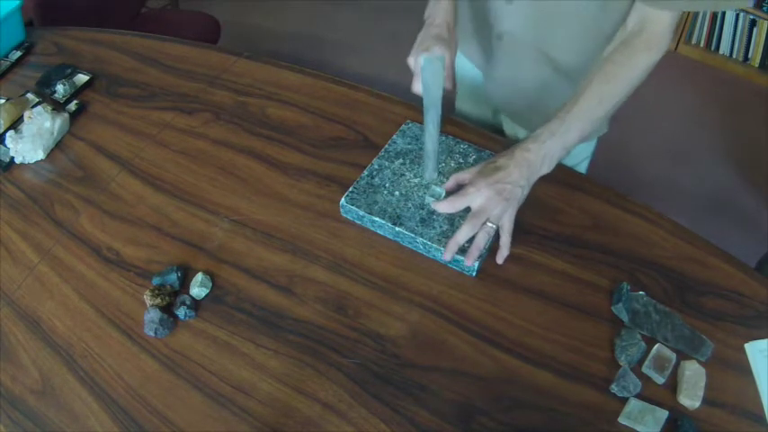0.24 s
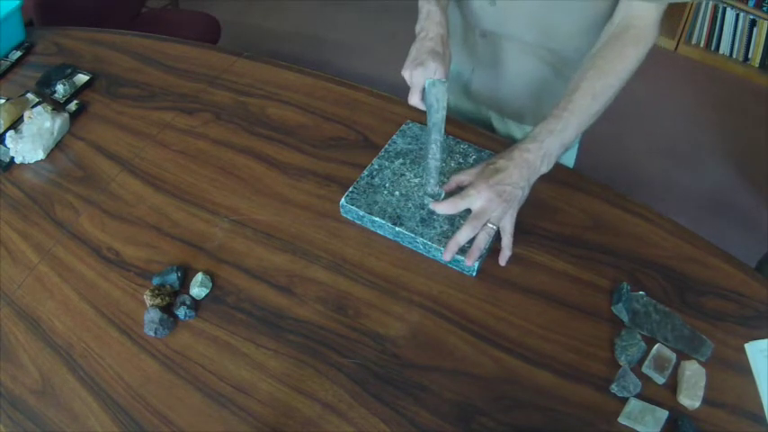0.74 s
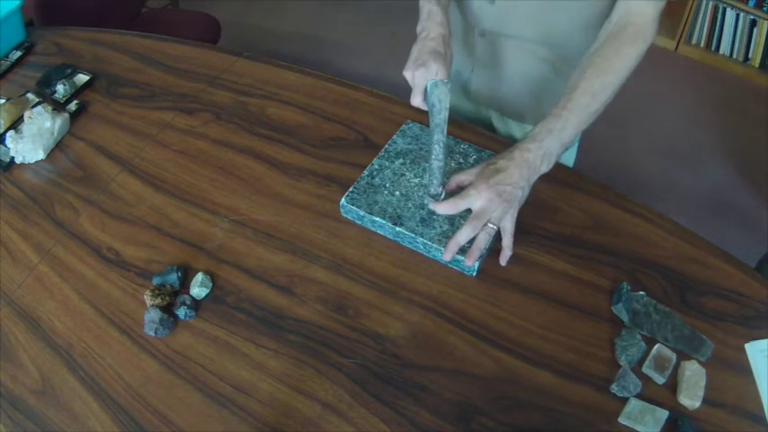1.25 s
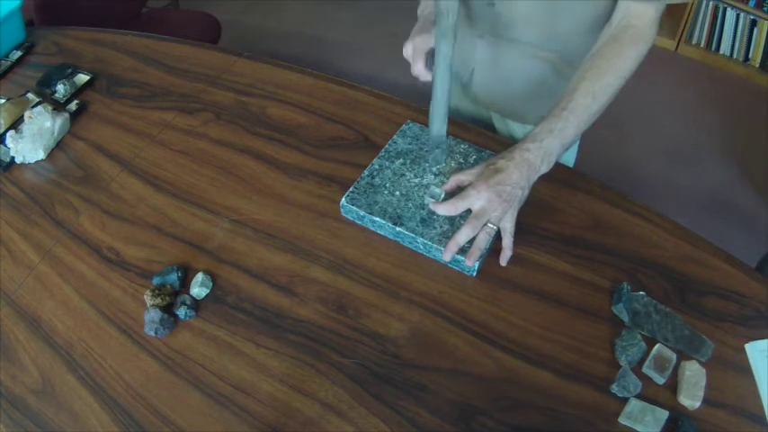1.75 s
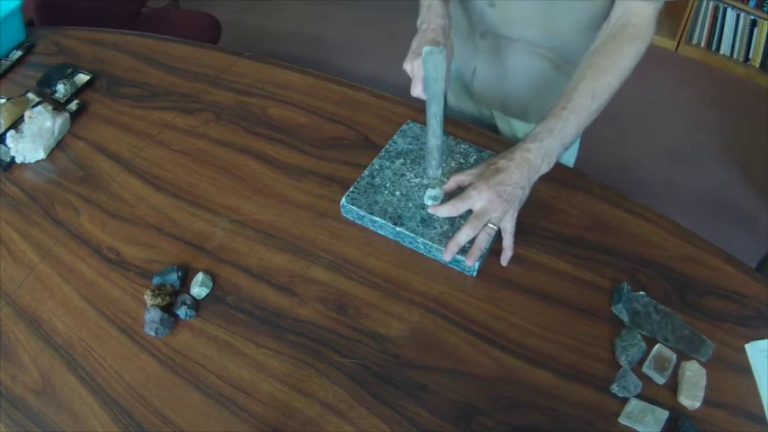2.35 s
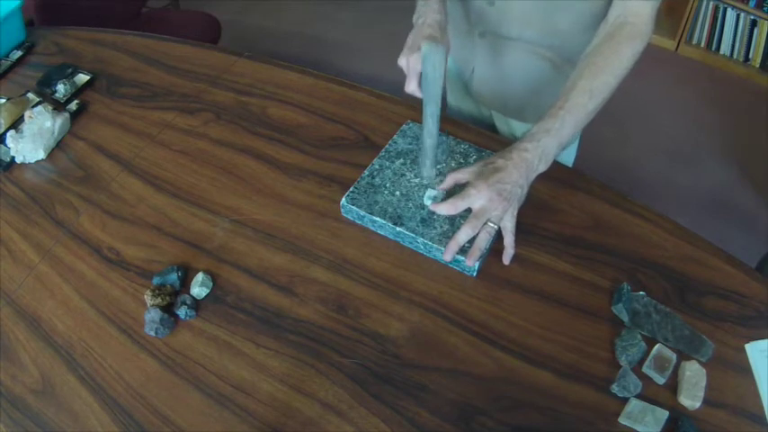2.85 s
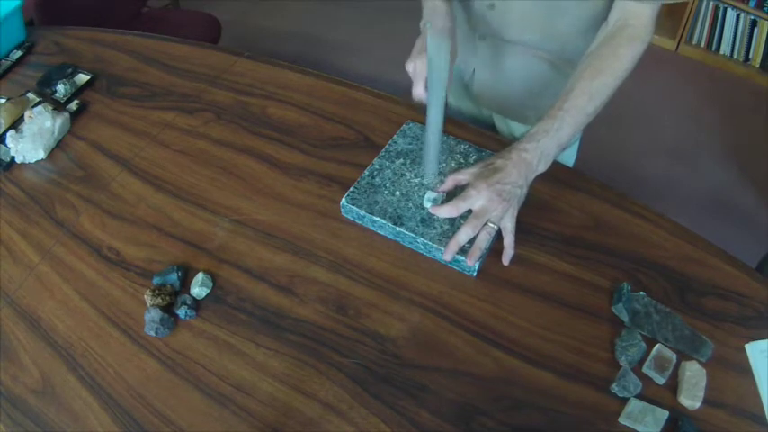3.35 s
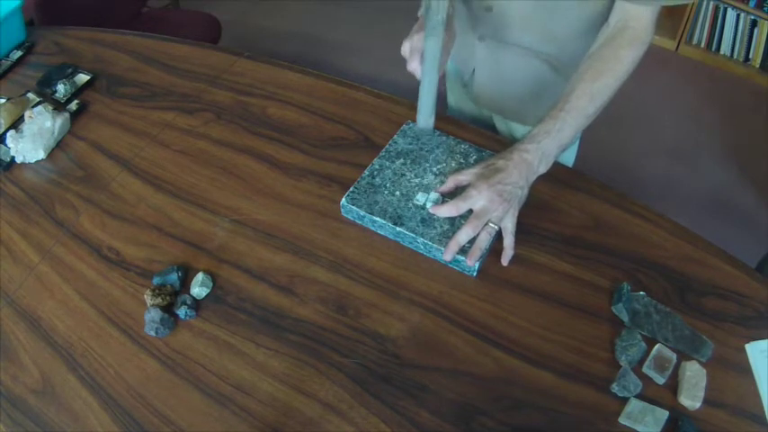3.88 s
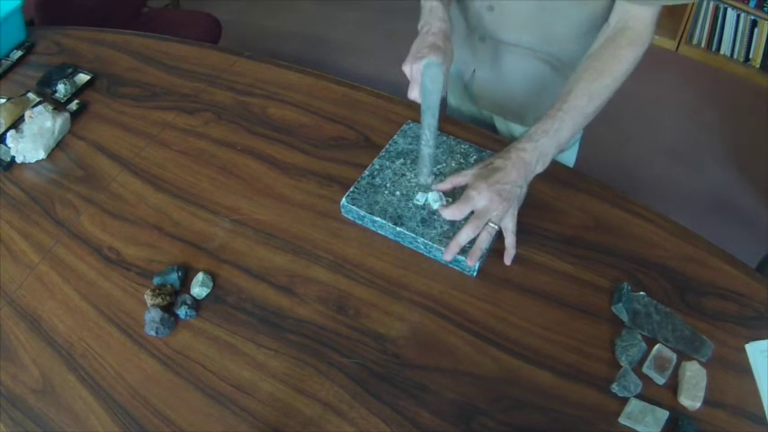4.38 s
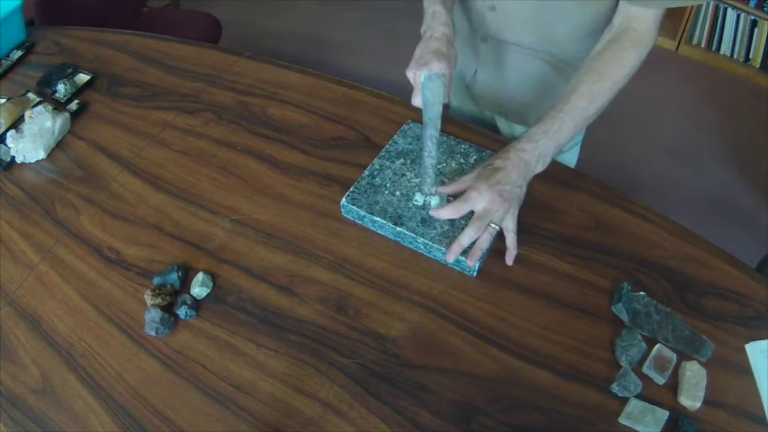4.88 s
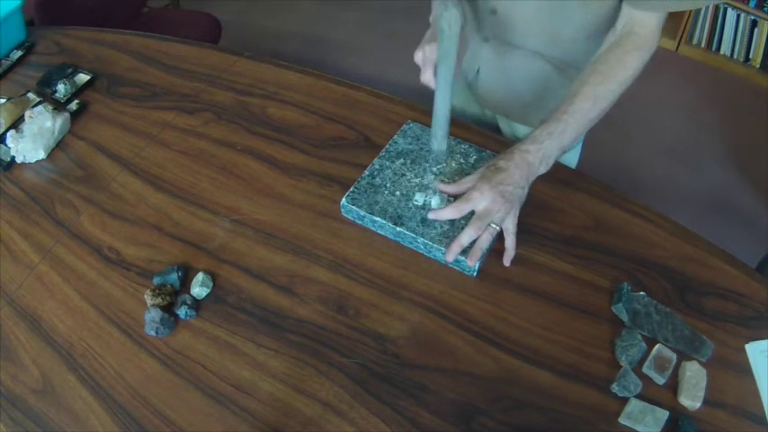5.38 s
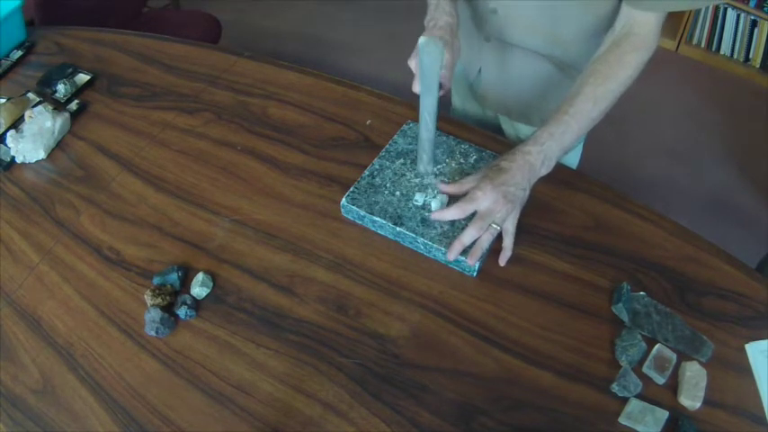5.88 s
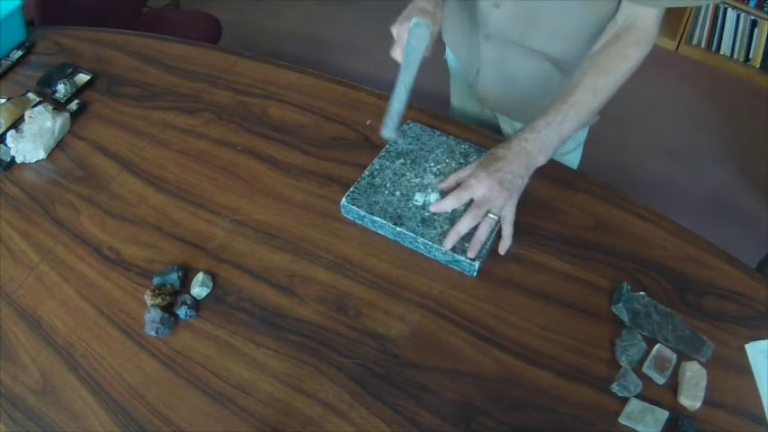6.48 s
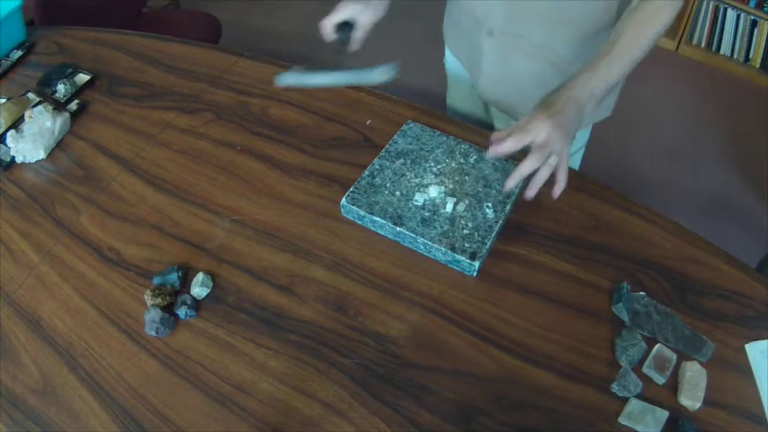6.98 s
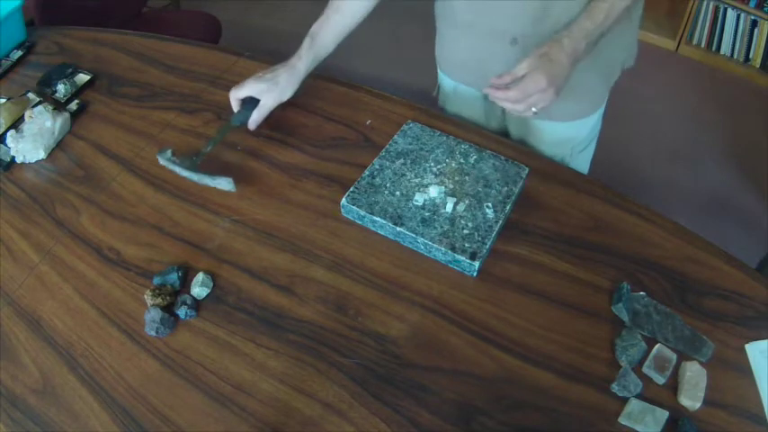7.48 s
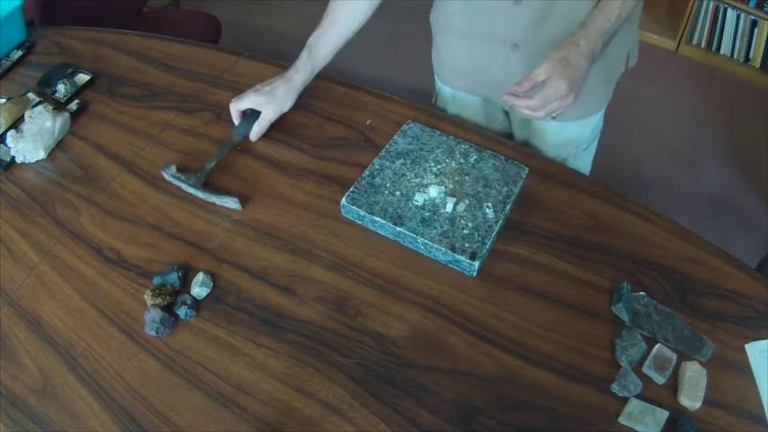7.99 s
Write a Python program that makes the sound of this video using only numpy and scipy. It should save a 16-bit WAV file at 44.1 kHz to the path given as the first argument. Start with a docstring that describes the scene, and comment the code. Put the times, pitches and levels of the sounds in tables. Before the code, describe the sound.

In a small room with a steady, low rush of ventilation, a crystal is split close to the microphone. After one soft trial tap come three loud hammer blows, steel clacking on stone, the crystal crunching and the wooden table booming with a brief room echo. Faint chip ticks and two soft bumps fall in the gaps. Last, the hammer knocks and rattles briefly as it is put down on the table.

```python
"""A small room with a wooden table, a stone slab on top. The chisel end of a steel hammer taps a crystal
on the slab, then strikes it three times: the crystal crunches, the slab clacks, the table booms, the
steel rings and the room answers. Chips tick and the table bumps softly as the crystal is handled.
At the end the hammer is laid on the table and clatters. Ventilation runs steadily underneath;
a limiter ducks it after each hard blow."""
import sys
import numpy as np
from scipy import signal
from scipy.fft import rfft, irfft, next_fast_len
from scipy.io import wavfile
from scipy.ndimage import uniform_filter1d, minimum_filter1d, map_coordinates

SR = 44100
rng = np.random.default_rng(int(sys.argv[2]) if len(sys.argv) > 2 else 0)


def generate_wav(signal):
    """Clip the signal to [-1, 1] and save it as 16-bit WAV at the path in sys.argv[1]."""
    frames = np.transpose(np.atleast_2d(signal))
    scaled = np.clip(frames, -1, 1) * 32767
    pcm = np.round(scaled).astype(np.int16)
    wavfile.write(sys.argv[1], SR, pcm)


N = 363075

# a trial tap, a blow and its rebound, two more blows: t/s, strength/dB, clack trim/dB, crunch trim/dB
HAMMER_HITS = [(1.3240, -16, -16.5, 8.5), (1.8746, 5.5, -2, 1.5), (1.9048, -9, 8, -13),
               (3.4265, 6.5, 1.5, -10), (5.5030, 7, 0, -12)]

def hammer_blows():
    """Steel meets crystal: each hit layers boom, crunch, clack and ring, then excites the room."""
    out = np.zeros(N)
    for start, db, clack_db, crunch_db in HAMMER_HITS:
        hardness_db = db + clack_db
        boom = table_boom(hardness_db)
        crunch = crystal_crunch(db, crunch_db)
        clack = slab_clack(clack_db)
        steel = hammer_ring(hardness_db)
        tail = reverb(amp(-8.5) * clack + amp(-11) * crunch, build=.0085)
        add(out, start, amp(db) * (with_reflections(boom, crunch) + clack + steel + tail))
    return out


# modes of the table under the slab: f/Hz, level/dB, t60/s
TABLE_MODES = [(60, -36, .45), (87, -30.5, .42), (111, -30.5, .45), (135, -32, .5), (176, -26.7, .31),
               (216, -16, .1), (271, -9.9, .1), (325, -24.5, .42), (364, -23, .36), (406, -29.6, .35),
               (456, -4, .05), (480, -26.5, .35), (525, -11.8, .17), (559, -18.4, .26), (648, -25.5, .32),
               (691, -4.2, .07), (722, -28.2, .42), (786, -13.6, .19), (807, -4.8, .09), (851, -16.8, .14),
               (934, -20, .2), (1031, -33.5, .33), (1241, -14.5, .03)]

def table_boom(hardness_db):
    """The blow pushes the table into ringing; a harder contact is shorter, so the boom is brighter."""
    push_hz = 2260 * 2 ** (hardness_db / 19.5)
    body = ring(TABLE_MODES, attack=.0004, scatter_db=.5) + amp(8) * wood_wash(build=.0038)
    boom = np.zeros(SR)
    add(boom, .0005, lowpass(body, push_hz, order=2))  # the push arrives once the edge has bitten
    return boom


# colour of the wood's dense modes: f/Hz, level/dB
WOOD_SPECTRUM = [(40, -10), (120, -3.5), (330, 1), (600, -1.5), (780, -3), (950, -3.5), (1300, -8),
                 (2200, -19.5), (4000, -54.5)]

def wood_wash(build):
    """Countless weak modes of table and room blur into one wash."""
    return reverb(click(WOOD_SPECTRUM), build)


# sizzle of crushed crystal: f/Hz, level/dB
CRUNCH_SPECTRUM = [(2500, -38), (5000, -14), (6600, -20), (7800, -5), (9200, -12), (12500, -2.5),
                   (14800, -2), (16000, -11.5)]

def crystal_crunch(strength_db, trim_db):
    """The crystal snaps and fine chips spray off; a stronger blow crushes finer and sounds brighter."""
    cutoff_hz = 12000 * 2 ** (strength_db / 21)
    snap = burst(CRUNCH_SPECTRUM, t60=.006)
    spray = amp(-9.5) * burst(CRUNCH_SPECTRUM, t60=.09)
    return amp(trim_db - 5) * lowpass(snap + spray, cutoff_hz, order=4)


# midrange bite of the slab: f/Hz, level/dB
CLACK_SPECTRUM = [(500, -62), (1100, 6), (1600, 10.5), (2400, 2.5), (3300, 3.5), (4400, -8.5), (5500, -18),
                  (7000, -24), (10000, -41), (16000, -48)]

def slab_clack(trim_db):
    """The stone takes the blow with a short, hard clack."""
    return amp(trim_db + 4) * burst(CLACK_SPECTRUM, t60=.053)


# rough ring of the hammer head: f/Hz, level/dB
STEEL_SPECTRUM = [(2400, -46), (3020, -6), (3150, 4), (3270, 4), (3350, -20), (4100, -16), (5000, -30)]
# its one clear mode: f/Hz, level/dB, t60/s
STEEL_MODE = [(3285, -38.5, 0.45)]

def hammer_ring(hardness_db):
    """The head rings in a narrow band around one clear mode; a harder contact wakes it more."""
    head = burst(STEEL_SPECTRUM, t60=.38) + ring(STEEL_MODE, attack=.0004, scatter_db=3)
    return amp(-17 + .31 * hardness_db) * head


# the hammer settling: t/s, strength/dB, clack trim/dB
BOUNCES = [(8.0479, -8.5, 5), (8.0865, -11, 4.5), (8.1075, -12.5, -4), (8.1128, -17, 12.5),
           (8.1155, -5, -16), (8.1345, -8.5, -10), (8.1528, -16.5, -15)]
# modes of the bare table top under a light, hard contact: f/Hz, level/dB, t60/s
TABLETOP_MODES = [(131, -21, 0.29), (359, -24, 0.23), (655, -2, 0.023), (759, 1, 0.028), (837, -2, 0.045),
                  (1414, -4.5, 0.021), (1673, -21, 0.057), (2050, -13, 0.03)]
# clack of steel on wood: f/Hz, level/dB
BOUNCE_SPECTRUM = [(300, -13), (650, -14), (900, -7), (1200, 7), (2000, 10), (2600, -30), (3300, -6),
                   (4800, -19.5), (5800, -21), (7500, -36), (15000, -46)]

def hammer_clatter():
    """The laid-down hammer bounces on the wood: each contact is a short knock with a clack on top."""
    out = np.zeros(N)
    for start, db, clack_db in BOUNCES:
        knock = ring(TABLETOP_MODES, attack=.0004, scatter_db=1)
        clack = amp(clack_db + 5.5) * burst(BOUNCE_SPECTRUM, t60=.021)
        wash = amp(3.5) * wood_wash(build=.0043)
        tail = reverb(amp(-10) * knock + amp(-6) * clack, build=.0012)
        add(out, start, amp(db) * (amp(-3.5) * knock + clack + wash + tail))
    return out


# touches of chips and fingers: t/s, relative level/dB, centre f/Hz
CHIP_TICKS = [(2.345, -33, 1430), (2.348, -46, 4000), (5.691, -52, 11030), (5.699, -48, 11500),
              (7.287, -49, 6650), (7.306, -46, 5800), (7.353, -57, 12000)]

def chip_ticks():
    """Handled chips give faint, narrow-band clicks."""
    out = np.zeros(N)
    for start, db, hz in CHIP_TICKS:
        tick = burst([(hz / 2, -22), (hz, 0), (hz * 2, -24), (hz * 4, -50)], t60=.009)
        tail = amp(-3.5) * reverb(tick, build=.0056)
        add(out, start, amp(db + 9.5) * (tick + tail))
    return out


# nudges as the crystal is repositioned: t/s, level/dB
TABLE_BUMPS = [(4.769, -12), (4.893, -7.5)]

def table_bumps(hz=120):
    """A soft touch wakes only the bass of the table."""
    out = np.zeros(N)
    spectrum = [(hz / 2, -20), (hz, 0), (hz * 2, -20), (hz * 10, -70)]
    for start, db in TABLE_BUMPS:
        add(out, start, amp(db) * burst(spectrum, t60=.15))
    return out


# slaps off ceiling and walls: delay/s, boom gain, crunch gain
REFLECTIONS = [(.009, .02, .5), (.0214, .15, .26), (.0315, .15, .06)]

def with_reflections(boom, crunch):
    """The direct hit, followed by its first bounces around the room."""
    out = boom + crunch
    for delay, boom_gain, crunch_gain in REFLECTIONS:
        add(out, delay, boom_gain * boom + crunch_gain * crunch)
    return out


# decay of the small room: f/Hz, t60/s
ROOM_DECAY = [(100, 0.4), (500, 0.44), (1500, 0.26), (3500, 0.22), (7000, 0.26), (14000, 0.21)]

def reverb(x, build):
    """A fresh diffuse tail swells with time constant build (s) and dies sooner in the treble."""
    hz, t, noise = signal.stft(rng.standard_normal(SR), SR, nperseg=256)
    decay = amp(-60 * t / along(ROOM_DECAY, hz)[:, None])
    tail = signal.istft(noise * decay, SR, nperseg=256)[1][:SR]
    tail *= 1 - np.exp(-np.arange(SR) / SR / build)
    return signal.fftconvolve(x, tail / np.linalg.norm(tail))[:SR]


# colour of the rushing air: f/Hz, relative level/dB
AIR_SPECTRUM = [(20, -2), (50, 1.5), (95, -4), (135, 1.5), (200, 0), (300, -3.5), (600, -1), (800, -8),
                (1050, -15), (1400, -19), (1900, -14.5), (3000, -25.5), (4200, -30.5), (5400, -31.5),
                (6600, -37), (10000, -39.5), (10500, -36.5), (11300, -43), (14500, -46), (16000, -67)]
# fan and mains tones: f/Hz, rms level/dB
HUM_TONES = [(118.6, -51.5), (414.5, -58), (581.4, -62.5)]

def ventilation():
    """A steady bed of rushing air under a few slightly wavering tones."""
    air = unit(filtered(rng.standard_normal(N), lambda hz: amp(along(AIR_SPECTRUM, hz))))
    t = np.arange(N) / SR
    hum = np.zeros(N)
    for hz, db in HUM_TONES:
        level = amp(db + 1.2 * wobble(.84))
        phase = 2 * np.pi * hz * t + 1.63 * wobble(6.7)
        hum += level * np.sqrt(2) * np.sin(phase)
    return amp(-44 + .73 * wobble(7.4)) * air + hum


def click(spectrum, size=2048):
    """The sharpest causal pulse with this spectrum, at energy 1."""
    gain = amp(along(spectrum, np.fft.rfftfreq(size, 1 / SR)))
    cepstrum = irfft(np.log(gain))
    cepstrum[1:size // 2] *= 2  # fold to minimum phase
    cepstrum[size // 2 + 1:] = 0
    pulse = irfft(np.exp(rfft(cepstrum)))
    return pulse / np.linalg.norm(pulse)


def burst(spectrum, t60):
    """One second that opens with a coloured, fading burst of noise, at energy 1."""
    t = np.arange(SR) / SR
    noise = rng.standard_normal(SR) * amp(-60 * t / t60)
    coloured = signal.fftconvolve(noise, click(spectrum))[:SR]
    return coloured / np.linalg.norm(coloured)


def ring(modes, attack, scatter_db):
    """One second of struck modes, each at a slightly new strength."""
    t = np.arange(SR) / SR
    hz, db, t60 = np.transpose(modes)[:, :, None]
    envelopes = amp(db + scatter_db * rng.standard_normal(db.shape) - 60 * t / t60)
    return (envelopes * np.sin(2 * np.pi * hz * t)).sum(0) * (1 - np.exp(-t / attack))


def wobble(rate):
    """A smooth random curve, rate knots a second."""
    knots = rng.standard_normal(int(N * rate / SR) + 4)
    return map_coordinates(knots, [np.arange(N) * rate / SR])


def lowpass(x, hz, order):
    """Causal low-pass: a softer contact or a coarser grain."""
    return signal.sosfilt(signal.butter(order, min(hz, .45 * SR), fs=SR, output="sos"), x)


def filtered(x, gain):
    """x through the EQ curve gain(hz)."""
    size = next_fast_len(len(x) + SR // 4)
    return irfft(rfft(x, size) * gain(np.fft.rfftfreq(size, 1 / SR)), size)[:len(x)]


def along(points, hz):
    """Read a curve of (f/Hz, value) points on a log frequency axis."""
    freqs, values = np.transpose(points)
    return np.interp(np.log(hz + 1), np.log(freqs + 1), values)


def amp(db):
    """Decibels to gain."""
    return 10 ** (np.asarray(db) / 20)


def unit(x):
    """x at rms 1."""
    return x / np.sqrt(np.mean(x ** 2) + 1e-20)


def add(track, start, sound):
    """Mix a sound into the track at start (s)."""
    part = track[round(start * SR):][:len(sound)]
    part += sound[:len(part)]


def scene():
    """Hammer, crystal and table over the ventilation, in mono."""
    return (hammer_blows() + hammer_clatter() + chip_ticks() + ventilation() + table_bumps())[None]


def limiter(x, ceiling_db, hold_s, release_db_per_s):
    """Peaks over the ceiling pull the gain down just ahead of them; it holds, then recovers."""
    ahead = int(.008 * SR)
    window = int(hold_s * SR) // 2 * 2 + 1
    over_db = np.maximum(20 * np.log10(np.abs(x) + 1e-9) - ceiling_db, 0)
    coming_db = np.pad(over_db[ahead:], (0, ahead))
    held_db = -minimum_filter1d(-coming_db, window, origin=window // 2, mode="constant")
    release_db = release_db_per_s * np.arange(N) / SR
    cut_db = np.maximum.accumulate(held_db + release_db) - release_db
    return x * amp(-uniform_filter1d(cut_db, ahead))


def record(dry):
    """Output chain: limiter, soft clip, low cut and a steep high cut."""
    limited = limiter(dry[0], ceiling_db=6, hold_s=.28, release_db_per_s=17.5)
    rounded = limited / (1 + np.abs(limited / 1.1) ** 6) ** (1 / 6)
    tightened = signal.lfilter(*signal.butter(2, 44, "highpass", fs=SR), rounded)
    return filtered(tightened, lambda hz: 1 / np.sqrt(1 + (hz / 15400) ** 120))[None]


dry = scene()
out = record(dry)
generate_wav(out)
```